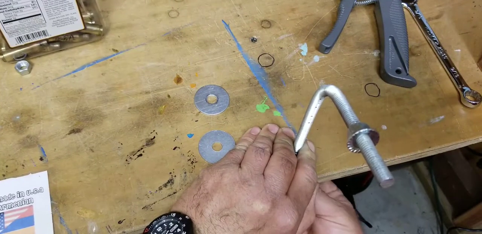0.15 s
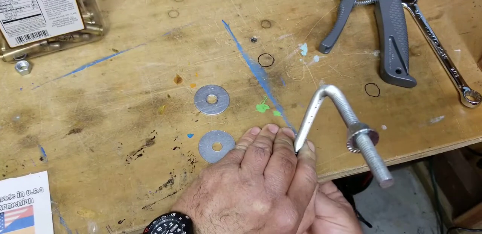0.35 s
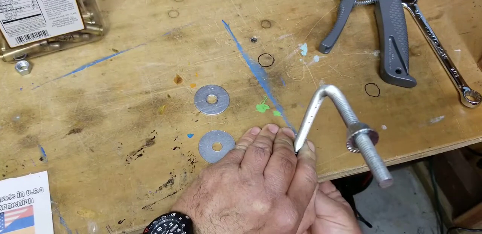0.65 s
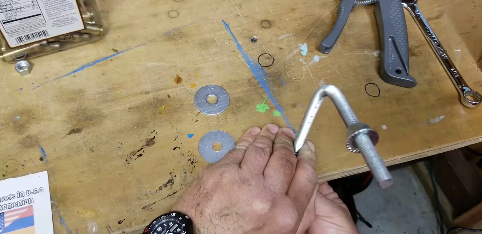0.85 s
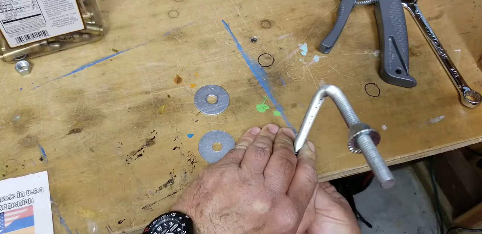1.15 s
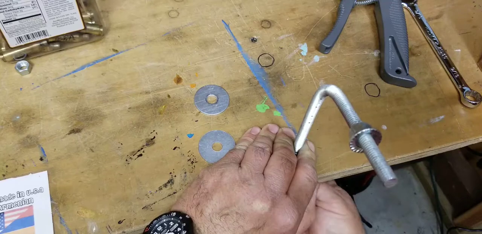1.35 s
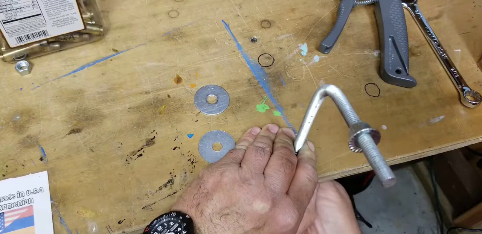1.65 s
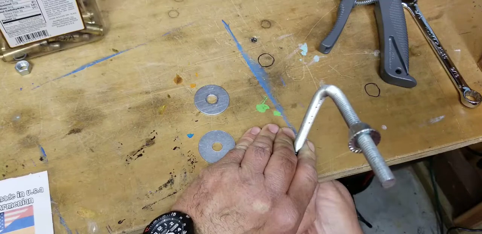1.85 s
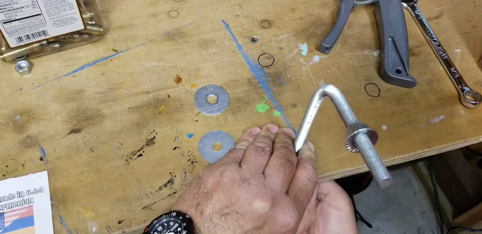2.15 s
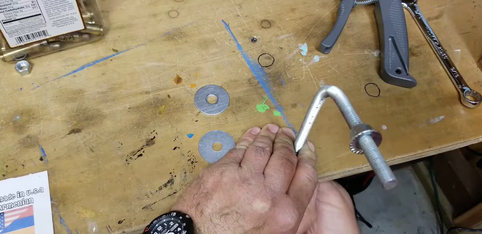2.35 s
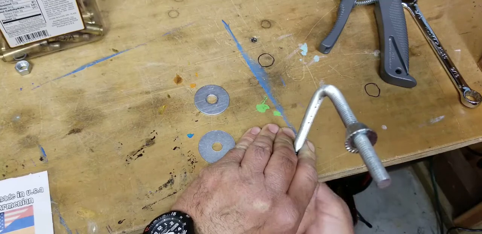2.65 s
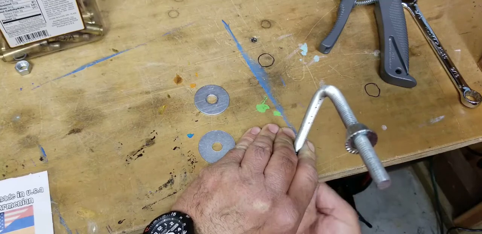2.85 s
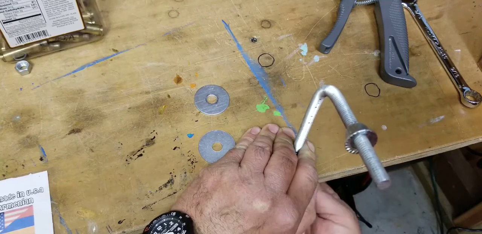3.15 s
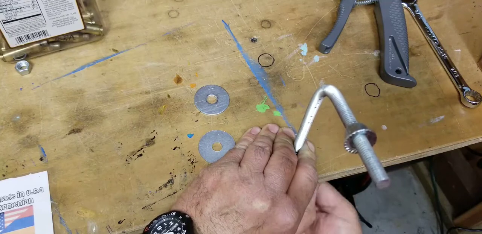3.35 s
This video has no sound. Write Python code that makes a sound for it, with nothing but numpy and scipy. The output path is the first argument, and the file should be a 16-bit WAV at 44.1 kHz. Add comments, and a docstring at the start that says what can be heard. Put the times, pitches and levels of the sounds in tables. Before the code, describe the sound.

Threaded steel rod with nut knocks dully on a wooden bench, a sharper tap midway, then a dense rattle with high metallic ringing and rubbing to the end; close stereo pickup, low room rumble.

```python
"""Steel nut on a threaded rod

A steel nut is handled and turned on a threaded rod held against a wooden workbench, in a small workshop.
The rod knocks dully on the bench top, lightly at first: short noise bursts through the bench resonances.
Then nut and washer clink and sing on the thread, as bright bursts and wavering sines.
Random slips make the rubbing and scraping, soft noise swells brush the rod, and low sines bump the bench.
Shaped noise gives the low rumble and faint hiss of the room."""
import sys
import numpy as np
from scipy import signal
from scipy.fft import rfft, irfft
from scipy.io import wavfile
from scipy.ndimage import uniform_filter1d

SR = 44100
rng = np.random.default_rng(int(sys.argv[2]) if len(sys.argv) > 2 else 0)


def materialize(psi):
    """Save the field psi as 16-bit PCM at rate SR to the path in sys.argv[1].

    A 1-D psi becomes a single channel; in a 2-D psi each row is a channel.
    """
    bounded = np.clip(np.atleast_2d(psi).T, -1, 1)
    quanta = np.round(bounded * 32767).astype(np.int16)
    wavfile.write(sys.argv[1], SR, quanta)


N = 154350  # length in samples

# Room air. Each row: frequency in Hz, relative noise density in dB per Hz.
AIR_COLOUR = [(15, -40), (30, -10), (47, 3), (65, 6.5), (95, -3.5), (150, -8.5), (300, -17.5), (600, -33.5),
              (1100, -34.5), (1700, -30), (2050, -14), (2200, -15), (2600, -35), (3300, -40), (7500, -46.5),
              (10000, -45), (12500, -32.5), (16000, -35.5)]
AIR_DB = -57.5

# Rubbing of fingers and thread over time. Each row: time in seconds, level in dB before the flicker.
RUB_LEVEL = [(0, -66.5), (.5, -68.5), (.6, -105), (0.851, -71), (1.1, -66), (1.3, -73), (1.5, -59.5),
             (1.85, -61.5), (2.07, -64.5), (2.3, -64.5), (2.45, -57.5), (2.56, -72), (2.61, -58),
             (2.72, -56.5), (2.8, -45), (3.0, -46), (3.13, -48), (3.25, -44), (3.31, -54), (3.4, -46),
             (3.5, -49.5)]
# Tone of the rubbing before the bench resonances. Each row: frequency in Hz, relative level in dB.
RUB_COLOUR = [(60, -6), (150, 11.5), (400, 5.5), (1200, 3), (2400, -1.5), (3300, -10.5), (6500, -20),
              (9200, -19), (13000, -8), (16000, -37)]
SLIPS_PER_S = 1500
RUB_FLICKER_DB, RUB_FLICKER_S = 2.1, 0.013  # depth, and spacing of the random levels
THREAD_DB, THREAD_FULL_FROM_DB = -22.5, -54  # trim of the steel, and the rub level that drives it fully

# Ringing of nut and washer. Each row: frequency in Hz, relative level in dB, 60 dB decay time in seconds.
STEEL_MODES = [(5360, -5.5, 0.11), (8750, -4, 0.08), (9006, 0, 0.2), (9350, -2, 0.08), (9900, -1, 0.07),
               (12995, 4, 0.23)]
# Ringing of the bench top. Each row: frequency in Hz, width in Hz, relative level in dB.
BENCH_MODES = [(146.7, 21, 0), (196, 22, 0), (240.3, 11, 0), (301, 38, 4.5), (431.6, 51, 0),
               (523.8, 31.6, 1), (765, 110, 1), (918, 47, 2.5), (1228, 124, 3.5), (1543, 93, 1.5),
               (1688, 60, -1.5), (1858, 134, 0), (2142, 104, 1), (2543, 245, -2.5)]
BENCH_DIRECT_DB = -5.5  # share that bypasses the resonances

# Skin brushing along the rod. Each row: start in seconds, length in seconds, level in dB at the peak.
BRUSHES = [(0, 0.23, -74), (1.42, 0.14, -74), (1.93, 0.14, -69), (2.17, 0.13, -73), (2.575, 0.1, -68)]
# Tone of skin on the rod. Each row: frequency in Hz, relative noise density in dB per Hz.
SKIN_COLOUR = [(200, -25), (1800, 0), (4000, -10), (8000, -13), (16000, -16)]

# Rod knocking on the bench. Each row: time in seconds, knock, thud and edge levels in dB before trim,
# chatter length in seconds, favoured frequency in Hz.
KNOCKS = [(0.159, -42.5, -54.5, -62.5, 0.0055, 1300), (0.279, -53.5, -60, -99, 0.014, 1220),
          (0.384, -42, -72, -101, 0.011, 900), (0.433, -54, -60.5, -91, 0.018, 1220),
          (0.495, -51, -59.5, -97, 0.011, 1160), (0.674, -49.5, -58.5, -89, 0.013, 1960),
          (0.703, -50.5, -64, -86, 0.0054, 905), (0.906, -43.5, -57, -63, 0.008, 950),
          (1.004, -44, -57, -68, 0.01, 1000), (1.018, -36, -46, -53, 0.008, 1500),
          (1.133, -48.5, -57, -77, 0.0045, 770), (1.151, -45, -57, -87, 0.0047, 1320),
          (1.198, -45, -59, -86, 0.0081, 1280), (1.355, -50, -69, -81, 0.014, 1770),
          (1.388, -50, -75, -85, 0.006, 1100), (1.498, -43, -50.5, -93, 0.0032, 1220),
          (1.55, -39, -47, -86, 0.0036, 1250), (1.593, -48, -55, -89, 0.007, 1210),
          (1.686, -48, -69, -82, 0.011, 1210), (1.721, -33.5, -41, -56, 0.0096, 1250),
          (1.736, -17.5, -39, -42, 0.006, 1850), (1.753, -32.5, -40, -49, 0.0067, 1620),
          (1.792, -40, -54, -68, 0.0065, 1600), (1.91, -50.5, -53.5, -76, 0.011, 1190),
          (1.945, -38.5, -53, -64, 0.0074, 1780), (1.984, -48, -62, -70, 0.014, 1700),
          (2.12, -50.5, -66, -76, 0.013, 1810), (2.143, -47.5, -53, -67, 0.0062, 1780),
          (2.247, -39, -51.5, -58, 0.0066, 1550), (2.339, -44, -38, -61.5, 0.011, 770),
          (2.398, -34, -46.5, -47, 0.0084, 1260), (2.409, -27.5, -39.5, -55, 0.0099, 1830),
          (2.49, -40.5, -46.5, -68, 0.0023, 1570), (2.648, -26, -42, -45, 0.0092, 1220),
          (2.692, -34, -49, -54, 0.0041, 1180), (2.731, -20.5, -32, -38.5, 0.0049, 1250),
          (2.741, -25, -32, -52, 0.003, 780), (2.776, -36.5, -44, -50, 0.0065, 1830),
          (2.789, -32, -41, -58, 0.005, 1200), (2.813, -23.5, -39, -50, 0.0079, 1200),
          (2.824, -23, -33.5, -44, 0.005, 1800), (2.863, -31.5, -47, -57, 0.0034, 764),
          (2.878, -28.5, -44, -46, 0.0074, 1510), (2.93, -26, -44, -43.5, 0.0055, 1340),
          (2.965, -29, -46.5, -39.5, 0.012, 1270), (2.983, -24.5, -39.5, -44, 0.0068, 1850),
          (3.02, -28.5, -41.5, -49, 0.012, 760), (3.051, -28, -50, -41, 0.0041, 1160),
          (3.084, -27, -36, -46, 0.0063, 1130), (3.154, -30.5, -42, -38.5, 0.0077, 1220),
          (3.188, -30, -49, -55, 0.0078, 750), (3.213, -22.5, -36, -39, 0.0074, 2310),
          (3.244, -29, -42, -40, 0.0054, 764), (3.328, -25, -39, -39.5, 0.0065, 2500),
          (3.379, -25.5, -40.5, -36, 0.0077, 1150), (3.408, -15.5, -32, -27.5, 0.005, 1900),
          (3.473, -38, -50, -48.5, 0.0092, 1830)]
# Tone of the low thud, before the bench. Each row: frequency in Hz, relative level in dB per Hz.
THUD_COLOUR = [(30, -35.5), (80, 0), (500, 1), (700, -20.5), (1500, -48), (16000, -77)]
# Tone of the woody knock, before the bench. Each row: frequency in Hz, relative level in dB per Hz.
KNOCK_COLOUR = [(100, -26), (450, -15.5), (750, -1), (1000, -2), (1300, -2.5), (2100, -1.5), (2750, -3),
                (3200, -18), (4500, -48), (16000, -48)]
# Tone of the hard edge. Each row: frequency in Hz, relative level in dB per Hz.
EDGE_COLOUR = [(500, -68), (2200, 1.5), (3500, 3), (5300, -5.5), (6200, -9), (10500, -12), (16000, -17.5)]
KNOCK_TRIM_DB, THUD_TRIM_DB, EDGE_TRIM_DB = -5, -1, -4
KNOCK_T60, THUD_T60, EDGE_T60 = 0.058, 0.077, 0.13  # seconds to fall 60 dB
RISE_S = 0.0014  # time constant of a blow's attack
LEAD_S = 0.002999  # thud and knock start this far ahead of the table time, the edge half as far
SOFT_BELOW_DB, SOFT_S_PER_DB = -28, 0.00003  # lighter touches swell more slowly
SPOT_DB, SPOT_WIDTH_HZ = 9.5, 380
GLINT_DB, GLINT_WIDTH_HZ, GLINT_LOW_HZ, GLINT_HIGH_HZ = 6.5, 153, 3247, 13440

# Low bumps of the bench: soft ones near 50 Hz from the leaning hand, deep knocks near 150 Hz.
# Each row: start in seconds, level in dB at the peak, frequency in Hz.
BUMPS = [(0.571, -53.5, 50), (1.0, -54, 52), (1.006, -47, 156), (1.315, -46.5, 48), (1.638, -49, 51.3),
         (2.716, -44.5, 153), (2.801, -42.5, 48), (2.9, -46, 52)]
BUMP_S = 0.05

# Steel singing as it slides. Each row: start in seconds, length in seconds, mean pitch in Hz,
# level in dB before the flutter.
SQUEALS = [(1.53, 0.11, 8830, -74.5), (1.69, 0.06, 8810, -69), (2.642, 0.05, 8830, -53),
           (2.765, 0.065, 12990, -43.5), (3.093, 0.045, 12995, -42), (3.232, .065, 12995, -41.5),
           (3.315, 0.13, 12995, -53)]
SQUEAL_FLUTTER_DB, SQUEAL_WANDER_HZ = 2.5, 25  # both rms

# Nut and washer striking the thread. Each row: time in seconds, click and ring levels in dB before trim,
# favoured frequency in Hz.
CLINKS = [(2.7284, -18, -26, 8950), (2.7744, -30.5, -37, 9300), (2.8854, -50, -45, 9200),
          (2.9222, -35, -33.5, 9300), (2.9692, -34, -42, 11370), (3.0194, -43, -56, 8960),
          (3.05, -35.5, -42, 12060), (3.152, -35, -42, 12400), (3.185, -35.5, -45, 11030),
          (3.2116, -32, -33, 9400), (3.225, -46, -44, 9300), (3.2506, -39, -37, 9050),
          (3.3773, -31, -35.5, 12400)]
# Tone of the click. Each row: frequency in Hz, relative level in dB per Hz.
CLICK_COLOUR = [(1000, -35), (3500, -19), (5300, 3), (6200, -4), (8000, 1.5), (9200, 7.5), (10500, 4.5),
                (12800, 6.5), (14200, -1), (16000, -5)]
CLICK_TRIM_DB, RING_TRIM_DB = -7.5, -8
CLICK_T60, CLICK_HOLD_S = 0.05, 0.0018
RING_WANDER_HZ, RING_DETUNE_HZ = 70, 48.8  # wander is rms, detune is the most either way
FLARE_DB, FLARE_WIDTH_HZ, FLARE_T60 = 8, 380, 0.12

# Room decay. Each row: frequency in Hz, 60 dB decay time in seconds.
ROOM_DECAY = [(150, 0.2), (1000, 0.15), (7000, 0.15), (15000, 0.1)]
ROOM_DB, ROOM_ONSET_S = -9, 0.0075

# Likeness of left and right. Each row: frequency in Hz, likeness from 0 to 1.
LIKENESS = [(290, .93), (560, 0.6), (780, 0.78), (1300, 0.62), (2100, 0.42), (5000, 0.05)]
# Balance of the microphones. Each row: frequency in Hz, left minus right in dB.
BALANCE = [(60, 0.5), (130, 2.8), (400, -1), (770, 2), (930, -2.5), (1120, 2.5), (1600, 0), (2000, 5.5),
           (2550, -3.5), (3500, -0.5), (8500, -2.5), (13000, 3)]
# Phase by which left leads. Each row: frequency in Hz, lead in radians.
PHASE_LEAD = [(420, 0), (540, 1), (700, -0.25), (930, -0.6), (1090, -2.2), (1300, -0.6), (1600, -0.8),
              (1900, 2), (2200, 0)]
LOW_CUT_HZ, HIGH_CUT_HZ = 31, 15950


def amp(db):
    """Turns decibels into gain."""
    return 10 ** (np.asarray(db) / 20)


def unit(x):
    """Scales a signal to rms 1."""
    return x / np.sqrt(np.mean(x ** 2) + 1e-20)


def read(points, hz):
    """Reads a table on a log-frequency axis."""
    f, value = np.transpose(points)
    return np.interp(np.log(hz + 1), np.log(f + 1), value)


def add(mix, s, sound):
    """Mixes a sound in at time s, in seconds."""
    part = mix[:, max(round(s * SR), 0):][:, :sound.shape[-1]]
    part += sound[..., :part.shape[1]]


def peak(x, hz, width_hz):
    """Passes a sound through one resonance."""
    b, a = signal.iirpeak(hz, hz / width_hz, fs=SR)
    return signal.lfilter(b, a, x)


def colour(x, points, wood=False):
    """Applies a causal filter of unit energy, with the bench resonances if wood."""
    size = 8192
    hz = np.fft.rfftfreq(size, 1 / SR)
    gain = amp(read(points, hz))
    if wood:
        power = amp(BENCH_DIRECT_DB) ** 2
        for f, width, db in BENCH_MODES:
            power = power + amp(db) ** 2 / (1 + (2 * (hz - f) / width) ** 4)
        gain = gain * np.sqrt(power)
    # Folding the cepstrum gives minimum phase: the sound starts at once and nothing precedes it.
    cepstrum = irfft(np.log(gain + 1e-6))
    cepstrum[1:size // 2] *= 2
    taps = irfft(np.exp(rfft(cepstrum[:size // 2], size)))[:size // 2]
    return signal.oaconvolve(x, taps[None] / np.linalg.norm(taps), axes=1)[:, :N]


def air():
    """Steady rumble and hiss of the workshop: shaped noise."""
    return amp(AIR_DB) * colour(rng.standard_normal((2, N)), AIR_COLOUR)


def rubbing():
    """Tiny slips of fingers and thread flicker in level; they shake the bench and keep the steel ringing."""
    t = np.arange(N) / SR
    slips = rng.random(N) < SLIPS_PER_S / SR
    flicker = np.interp(t / RUB_FLICKER_S, np.arange(SR), rng.standard_normal(SR))
    level = np.interp(t, *np.transpose(RUB_LEVEL))
    drive = unit(slips * rng.standard_normal((2, N))) * amp(level + RUB_FLICKER_DB * flicker)

    age = t[:SR // 4]
    ring = sum(amp(db - 60 * age / t60) * np.sin(2 * np.pi * hz * age) for hz, db, t60 in STEEL_MODES)
    ring = ring / np.linalg.norm(ring)
    firm = amp(np.minimum(level - THREAD_FULL_FROM_DB, 0))  # light rubbing hardly rings the steel
    steel = signal.oaconvolve(drive * firm, ring[None], axes=1)[:, :N]
    return colour(drive, RUB_COLOUR, wood=True) + amp(THREAD_DB) * steel


def brushes():
    """Skin slides along the rod in soft swells of hiss."""
    out = np.zeros((2, N))
    for s, length, db in BRUSHES:
        t = np.arange(0, length, 1 / SR)
        hiss = rng.standard_normal((2, len(t)))
        add(out, s, amp(db) * np.sin(np.pi * t / length) * hiss)
    return colour(out, SKIN_COLOUR)


def burst(hold, t60, rise=RISE_S):
    """A blow: dense chatter that rises, holds and dies, with its energy spread evenly over frequency."""
    t = np.arange(SR // 5) / SR
    attack = 1 - np.exp(-(t + 1 / SR) / rise)
    shape = attack * amp(-60 * np.maximum(t - hold, 0) / t60)
    x = rng.standard_normal((2, len(t))) * shape
    for _ in range(3):  # flatten the spectrum, then restore the envelope
        even = irfft(np.exp(1j * np.angle(rfft(x))), len(t))
        local_power = abs(uniform_filter1d(even ** 2, size=128, axis=1))
        x = even * shape / np.sqrt(local_power + 1e-12)
    return x


def struck_spot(x, hz):
    """Each contact point favours its own part of the bench's range; the whole drops by half the boost."""
    y = x + (amp(SPOT_DB) - 1) * peak(x, hz, SPOT_WIDTH_HZ)
    return y / amp(SPOT_DB / 2)


def glints(x):
    """Every steel contact stresses or thins a few high resonances of its own; total energy is kept."""
    y = x.copy()
    for hz in np.linspace(GLINT_LOW_HZ, GLINT_HIGH_HZ, num=12) * rng.uniform(.94, 1.06, size=12):
        strength = rng.choice([-1, 1]) * amp(GLINT_DB) * rng.random((2, 1))
        y += strength * peak(x, hz, GLINT_WIDTH_HZ)
    return y * np.linalg.norm(x) / np.linalg.norm(y)


def knocks():
    """The rod chatters on the bench: a low thud, a woody knock and a hard edge."""
    thud, knock, edge = np.zeros((3, 2, N))
    for s, knock_db, thud_db, edge_db, chatter, hz in KNOCKS:
        rise = RISE_S + SOFT_S_PER_DB * max(SOFT_BELOW_DB - knock_db, 0)
        low = burst(chatter, THUD_T60)
        woody = struck_spot(burst(chatter, KNOCK_T60, rise), hz)
        hard = glints(burst(chatter, EDGE_T60))
        add(thud, s - LEAD_S, amp(thud_db + THUD_TRIM_DB) * low)
        add(knock, s - LEAD_S, amp(knock_db + KNOCK_TRIM_DB) * woody)
        add(edge, s - LEAD_S / 2, amp(edge_db + EDGE_TRIM_DB) * hard)
    wood = colour(thud, THUD_COLOUR, wood=True) + colour(knock, KNOCK_COLOUR, wood=True)
    return wood + colour(edge, EDGE_COLOUR)


def bumps():
    """Low bumps of the bench, each a swelling sine: soft near 50 Hz, deep knocks near 150 Hz."""
    out = np.zeros((2, N))
    t = np.arange(0, BUMP_S, 1 / SR)
    swell = np.sin(np.pi * t / BUMP_S) ** 2
    for s, db, hz in BUMPS:
        add(out, s, amp(db) * swell * np.sin(2 * np.pi * hz * t))
    return out


def waver(length):
    """Quick random drift, rms 1, separate for each channel."""
    return unit(uniform_filter1d(rng.standard_normal((2, length)), size=200, axis=1))


def wandering_sine(pitch):
    """A sine that follows a moving pitch from a random starting phase in each channel."""
    turns = np.cumsum(pitch, axis=1) / SR + rng.random((2, 1))
    return np.sin(2 * np.pi * turns)


def squeals():
    """Sliding keeps one steel mode singing unsteadily for a moment."""
    out = np.zeros((2, N))
    for s, length, hz, db in SQUEALS:
        t = np.arange(0, length, 1 / SR)
        tone = wandering_sine(hz + SQUEAL_WANDER_HZ * waver(SR // 4)[:, :len(t)])
        flutter = SQUEAL_FLUTTER_DB * waver(SR // 4)[:, :len(t)]
        add(out, s, amp(db + flutter) * np.sin(np.pi * t / length) * tone)
    return out


def flare(hz):
    """Chattering steel flares up in a broad resonance that depends on the point of contact."""
    return peak(burst(CLICK_HOLD_S, FLARE_T60), hz, FLARE_WIDTH_HZ)


def clinks():
    """Steel on steel: a bright click and a high ring that shimmers as the loose parts rattle."""
    click, ring = np.zeros((2, 2, N))
    t = np.arange(SR // 4) / SR
    attack = 1 - np.exp(-t / RISE_S)
    for s, click_db, ring_db, flare_hz in CLINKS:
        add(ring, s, amp(ring_db + FLARE_DB) * flare(flare_hz))
        add(click, s, amp(click_db + CLICK_TRIM_DB) * glints(burst(CLICK_HOLD_S, CLICK_T60)))
        for hz, db, t60 in STEEL_MODES:
            detune = RING_DETUNE_HZ * rng.uniform(-1, 1)
            tone = wandering_sine(hz + detune + RING_WANDER_HZ * waver(len(t)))
            decay = amp(ring_db + RING_TRIM_DB + db - 60 * t / t60)
            add(ring, s, decay * tone * attack / 2)
    return colour(click, CLICK_COLOUR) + ring


def room(x):
    """A diffuse tail of even colour, each band dying at its own speed."""
    hz, t, z = signal.stft(rng.standard_normal((2, SR // 2)), SR, nperseg=256)
    decay = amp(-60 * t / read(ROOM_DECAY, hz)[:, None])
    tail = signal.istft(z * decay, SR, nperseg=256)[1]
    onset = np.minimum(np.arange(tail.shape[1]) / SR / ROOM_ONSET_S, 1) ** 4
    z = rfft(tail * onset)
    even = z / np.sqrt(uniform_filter1d(abs(z) ** 2, size=15, axis=1))
    tail = irfft(even, len(onset)) * onset
    return signal.fftconvolve(x, tail / np.linalg.norm(tail[0]), axes=1)[:, :N]


def scene():
    """Rod, nut and bench in the room; bumps and air take no added tail."""
    work = rubbing() + brushes() + knocks() + squeals() + clinks()
    return air() + work + bumps() + amp(ROOM_DB) * room(work)


def record(dry):
    """Two close microphones share the bass; the deepest rumble and the top are cut."""
    hz = np.fft.rfftfreq(2 * N, 1 / SR)
    a, b = rfft(dry, 2 * N) / np.sqrt(1 + (LOW_CUT_HZ / (hz + 1)) ** 8)
    # Blending the two channels by this angle sets their likeness.
    turn = np.arcsin(np.clip(read(LIKENESS, hz), -1, 1)) / 2
    lean = amp(read(BALANCE, hz) / 2) * np.exp(1j * read(PHASE_LEAD, hz) / 2)
    left = (np.cos(turn) * a + np.sin(turn) * b) * lean
    right = (np.cos(turn) * b + np.sin(turn) * a) / lean
    pair = irfft(np.array([left, right]))[:, :N]
    high_cut = signal.firwin(511, HIGH_CUT_HZ, window=("kaiser", 9), fs=SR)
    return signal.oaconvolve(pair, high_cut[None], "same")


dry = scene()
out = record(dry)
materialize(out)
```